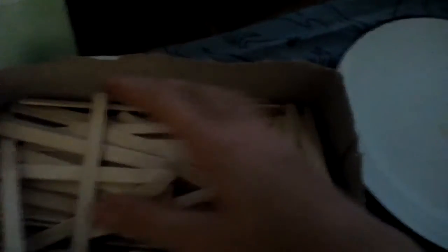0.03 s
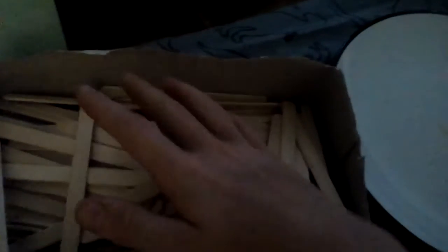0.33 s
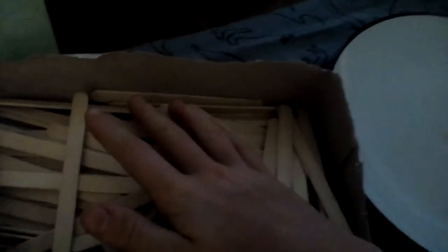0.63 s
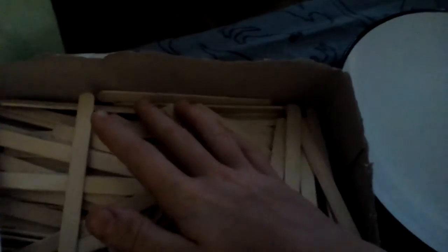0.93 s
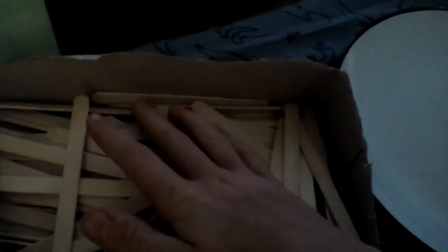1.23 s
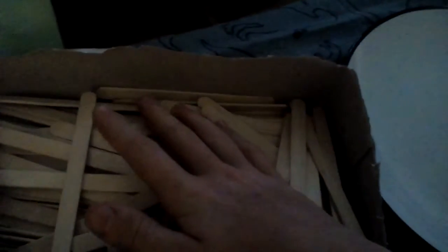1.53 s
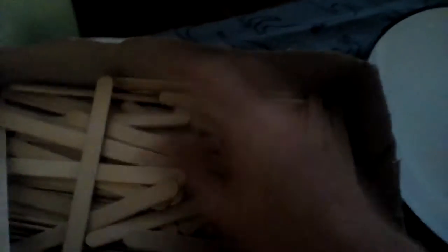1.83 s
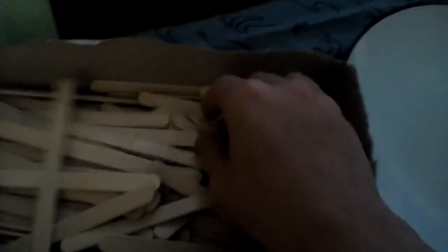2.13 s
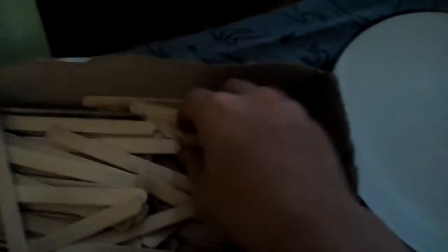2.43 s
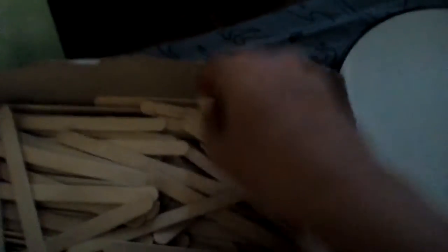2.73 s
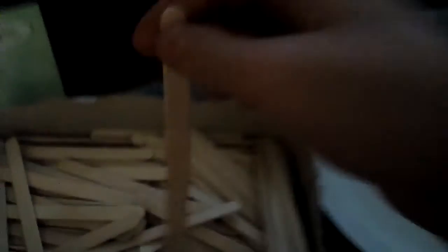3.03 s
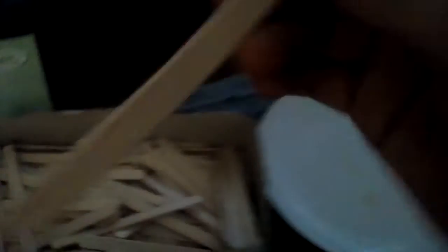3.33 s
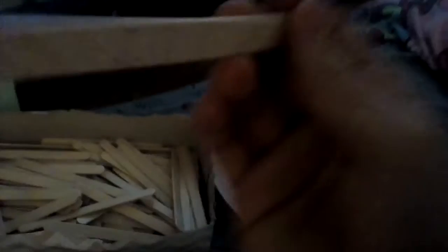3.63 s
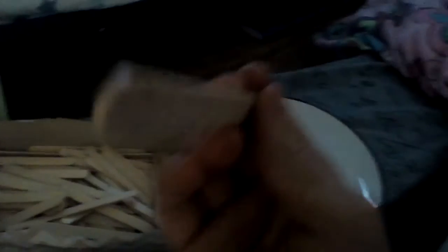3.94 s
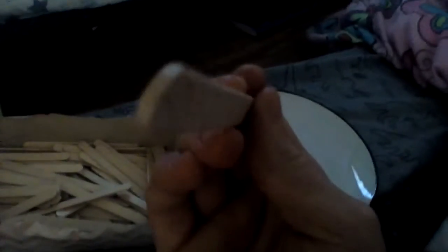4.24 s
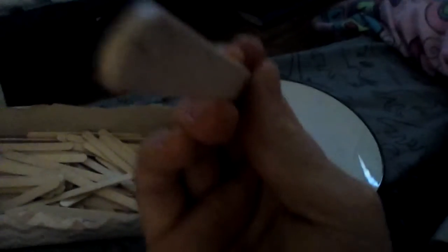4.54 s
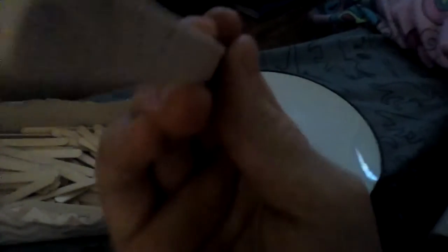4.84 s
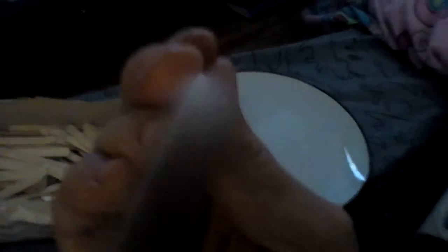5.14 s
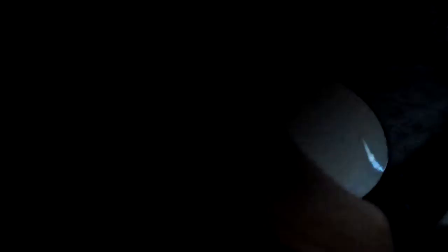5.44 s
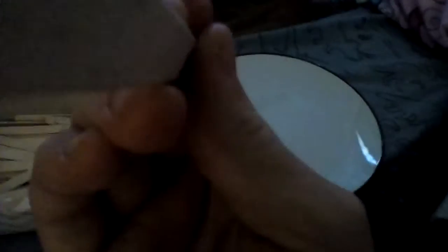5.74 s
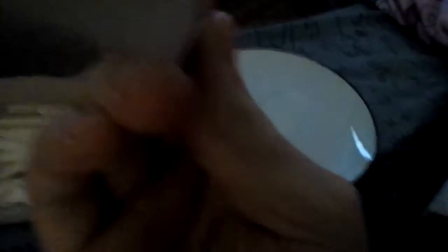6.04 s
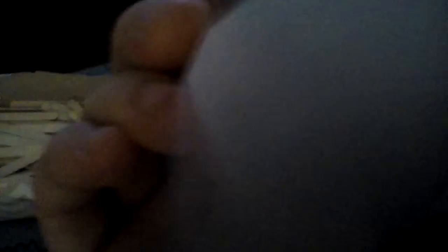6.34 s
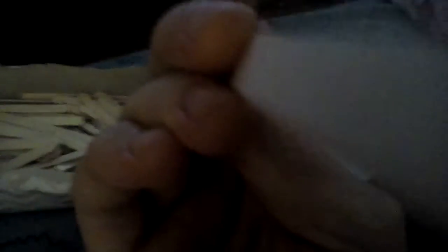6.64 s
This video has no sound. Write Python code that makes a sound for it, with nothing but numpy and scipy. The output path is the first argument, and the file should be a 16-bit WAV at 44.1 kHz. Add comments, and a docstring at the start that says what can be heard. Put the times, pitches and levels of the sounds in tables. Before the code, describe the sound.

A quiet room is heard through a small microphone, with low hum, light hiss and a faint, thin fan whine. Around 1.4 seconds flat wooden craft sticks slide faintly, with one click at 1.7. From 1.9 to 3 seconds a hand rummages through them: quick, bright clacks and sliding, with slight room echo and a soft rumble from their cardboard box. At 3.5 a soft bump nudges the microphone and the whine stops. Only room tone follows until 5.3, when a stick covers the microphone with a brief hollow rush falling in pitch and a swell of fading hiss. A loud, sharp tap on the casing comes at 5.5. From 5.7 the stick scrapes in short, rasping strokes, very close and almost dry, with sharp taps near 6 and 6.5. The strongest scrape and a few quick taps come at about 6.6 seconds.

```python
"""A quiet room, one small camera microphone. A hand rummages in a cardboard box of flat wooden craft
sticks and draws one out: the box rumbles, the sticks clack and slide on one another, with some room on them.
A faint fan whine stops when the camera is nudged. The stick closes over the microphone with a hollow rush
and a swell of hiss, then taps and scrapes on the camera's case, very close and almost dry."""
import sys
import numpy as np
from scipy import signal
from scipy.fft import rfft, irfft, next_fast_len
from scipy.io import wavfile
from scipy.ndimage import map_coordinates

SR = 44100
rng = np.random.default_rng(int(sys.argv[2]) if len(sys.argv) > 2 else 0)


def pcm_store(signal):
    """Save signal as 16-bit PCM."""
    levels = np.round(np.clip(np.atleast_2d(signal), -1, 1) * 32767)
    wavfile.write(sys.argv[1], SR, levels.astype(np.int16).T)


N = 294147

# room tone: f/Hz, level/dB
ROOM_TONE = [(15, -27), (25, -25), (43, -9), (103, -5), (189, -12), (294, -2.5), (606, -13), (696, -7.5),
             (747, -12), (942, -20), (1110, -16.5), (1220, -24), (6500, -33.5), (8450, -93), (14300, -120)]
# decay of the room: f/Hz, t60/s
ROOM_DECAY = [(200, 0.73), (2000, 0.41), (8000, 0.18)]
# microphone response: f/Hz, level/dB
MIC_RESPONSE = [(6600, 6), (7100, -1), (7900, -7.5), (10000, -10), (12000, -19.5), (15000, -35)]
# the box shifting under the hand: t/s, length/s, level/dB
BOX_SHIFTS = [(1.97, .06, -65.5), (2.14, .34, -62.5), (2.74, .47, -66), (3.5, 0.18, -64.5),
              (3.92, 0.026, -64)]
# cardboard rumble: f/Hz, level/dB
BOX_SPECTRUM = [(20, -8), (65, 7.5), (120, 0), (250, -17.5), (600, -11), (2000, -104)]
# soft bumps on the camera: t/s, level/dB
NUDGES = [(3.53, -41.5), (3.549, -48)]
# rush of the stick closing over the microphone: f/Hz, level/dB
COVER_RUSH = [(60, -14), (250, -8), (600, 1.5), (1450, -9.5), (1900, -25), (4000, -37)]
# hiss of the covered microphone: f/Hz, level/dB
COVER_HISS = [(60, -12), (300, -5.5), (2000, 1.5), (6400, 0.5), (7200, -6), (8000, -18), (15000, -32)]
# bending and twisting modes of one stick: f/Hz, level/dB, t60/s
STICK_MODES = [(914, -19, 0.071), (1570, -37, 0.03), (2416, -14.5, 0.059), (3320, -8.5, 0.027),
               (4460, -6.5, 0.019), (5520, -54, 0.03), (6290, -3.5, 0.011), (9750, -8, 0.031),
               (10650, 6, 0.012)]
# response of the pile of sticks: f/Hz, level/dB
PILE_SPECTRUM = [(60, -43), (250, 5.5), (600, 8), (1300, 4), (2300, 3.5), (3500, 2.5), (6400, 8.5),
                 (7500, 15.5), (8600, -0.5), (10500, -1.5), (15000, 1)]
# pushes that set the sticks sliding: t/s, length/s, level/dB
PUSHES = [(1.425, 0.037, -64), (1.62, 0.034, -67), (1.689, 0.042, -63), (1.879, 0.09, -53.5),
          (1.972, 0.011, -43), (2.13, 0.1, -47), (2.331, 0.036, -40.5), (2.425, 0.16, -52),
          (2.627, 0.022, -46), (2.739, 0.085, -44.5), (2.922, 0.029, -63)]
# the loudest knocks of stick on stick: t/s, level/dB, snap f/Hz
CLACKS = [(1.6963, -29, 5900), (1.957, -36, 5270), (1.9805, -34, 4640), (2.1115, -30.5, 5000),
          (2.1456, -24, 6430), (2.1675, -25, 7140), (2.1887, -22.5, 6220), (2.211, -32, 4740),
          (2.2374, -26, 4760), (2.3415, -29, 6200), (2.379, -30, 3720), (2.4566, -29.5, 5360),
          (2.4796, -25.5, 4140), (2.5022, -28.5, 2800), (2.5968, -34.5, 6040), (2.6449, -25.5, 4460),
          (2.7516, -26, 5660), (2.7866, -22.5, 4300), (2.9277, -25, 6220), (2.9494, -20.5, 6100)]
# path through the case to the microphone: f/Hz, level/dB
CASE_SPECTRUM = [(25, -29), (60, 3), (140, 2.5), (270, -0.5), (460, -15.5), (700, -1.5), (930, -14.5),
                 (1200, -10.5), (3200, -15), (4400, -6.5), (6200, 7), (7200, 2), (8100, -5), (9200, -8.5),
                 (15000, -1)]
# waves returning from the case's edges: t/s, level/dB
CASE_ECHOES = [(.0012, -61), (.0019, -21.5), (.0034, -28.5)]
# hollow resonances of the case: f/Hz, width/Hz, level/dB
CASE_MODES = [(150, 130, -7.5), (330, 39, -10), (606, 140, -14), (1170, 105, -0.5), (1390, 100, -18),
              (4060, 1600, 0)]
# strokes along the case: t/s, length/s, rasp level/dB, shudder level/dB
SCRAPES = [(5.693, 0.11, -58, -46), (5.926, 0.027, -41, -39), (5.945, 0.0076, -33.5, -39.5),
           (6.029, 0.0043, -47, -69), (6.138, 0.044, -40, -38.5), (6.27, 0.08, -40.5, -40.5),
           (6.334, 0.049, -36.5, -52), (6.363, 0.0075, -35, -50), (6.395, 0.0081, -52, -58),
           (6.465, 0.017, -41.5, -42.5), (6.567, 0.034, -51, -56), (6.602, 0.071, -19, -33)]
# the stick striking the case: t/s, level/dB
TAPS = [(5.501, -5), (5.7169, -24.5), (5.9243, -25.5), (5.9655, -11.5), (6.161, -23), (6.4804, -5.5),
        (6.5534, -28), (6.6237, -21.5), (6.639, -10.5), (6.6524, -18)]


def amp(db):
    """Decibels to gain."""
    return 10 ** (np.asarray(db) / 20)


def unit(x):
    """Scale to rms 1."""
    return x / np.sqrt(np.mean(x ** 2) + 1e-20)


def along(points, hz):
    """Read (f/Hz, value) points on a log frequency axis."""
    f, v = np.transpose(points)
    return np.interp(np.log(hz + 1), np.log(f + 1), v)


def wobble(rate):
    """A smooth random curve, rate knots a second."""
    return map_coordinates(rng.standard_normal(int(N * rate / SR) + 4), [np.arange(N) * rate / SR])


def filtered(x, response):
    """x through a gain given as a function of frequency."""
    size = next_fast_len(len(x) + SR // 4)
    return irfft(rfft(x, size) * response(np.fft.rfftfreq(size, 1 / SR)), size)[:len(x)]


def noise(spectrum):
    """Coloured noise of rms 1."""
    return unit(filtered(rng.standard_normal(N), lambda hz: amp(along(spectrum, hz))))


def convolve(x, response):
    """x played through an impulse response."""
    return signal.oaconvolve(x, response)[:N]


def impulse_response(spectrum, lag_ms=0, size=4096):
    """Causal response of a body; bending waves near 600 Hz arrive lag_ms late, higher ones sooner."""
    hz = np.fft.rfftfreq(size, 1 / SR)
    cepstrum = irfft(np.log(amp(along(spectrum, hz))))
    cepstrum[1:size // 2] *= 2  # fold to minimum phase
    cepstrum[size // 2 + 1:] = 0
    phase = 4 * np.pi * lag_ms * np.sqrt((hz + 400) / 1000)
    return irfft(np.exp(rfft(cepstrum) - 1j * (phase - phase[0])))


def pressure(strokes, attack_s, release_s, sag_db_per_s=0):
    """Gain from (t/s, length/s, level/dB) strokes: each builds up, holds or sags, and lets go."""
    gain, t = np.zeros(N + SR), np.arange(SR) / SR
    for start, length, db in strokes:
        shape = np.minimum(t / attack_s, 1) * np.exp(-np.maximum(t - length, 0) / release_s)
        gain[round(start * SR):][:SR] += amp(db - sag_db_per_s * t) * shape
    return gain[:N]


def slips(rate, unevenness, spread_db):
    """Stick-slip friction: about rate pulses a second, at uneven gaps and of uneven size."""
    gaps, sizes = rng.standard_normal((12000, 2)).T
    at = (np.cumsum(np.exp(unevenness * gaps - unevenness ** 2 / 2)) * SR / rate).astype(int)
    return np.bincount(at[at < N], amp(spread_db * np.clip(sizes[at < N], -2, 2)), N)


def background(air_db=-71.5, hiss_db=-77, whine_db=-75, whine_hz=697.6):
    """Room tone, microphone hiss and a thin fan whine that ends at the first nudge."""
    t = np.arange(N) / SR
    running = np.clip((NUDGES[0][0] - t) / 0.093, 0, 1)
    phase = 2 * np.pi * np.cumsum(whine_hz + 2.5 * wobble(25)) / SR
    whine = running * amp(whine_db) * unit(np.sin(phase) * amp(wobble(12)))
    return amp(air_db) * noise(ROOM_TONE) + amp(hiss_db) * rng.standard_normal(N) + whine


def room(x):
    """The short diffuse tail off nearby walls; the treble dies first."""
    hz, t, spectra = signal.stft(rng.standard_normal(SR // 2), SR, nperseg=256)
    decay = amp(-60 * t / along(ROOM_DECAY, hz)[:, None])
    tail = signal.istft(spectra * decay, SR, nperseg=256)[1]
    return convolve(x, np.pad(tail / np.linalg.norm(tail), (SR // 300, 0)))


def box(level_db=-2):
    """Off microphone, the cardboard box rumbles as the hand pushes in it."""
    return amp(level_db) * pressure(BOX_SHIFTS, attack_s=0.025, release_s=0.024) * noise(BOX_SPECTRUM)


def nudges(thud_hz=125, width_s=0.0054):
    """Handling noise: each soft bump rocks the camera for a cycle or two."""
    t = np.arange(N) / SR
    return sum(-amp(db) * np.exp(-((t - s) / width_s) ** 2) * np.sin(2 * np.pi * thud_hz * (t - s))
               for s, db in NUDGES)


def covering(cover_s=5.329, hiss_s=5.372, open_hz=1052, closed_hz=151.6, closing_s=0.054):
    """Right at the microphone, the narrowing gap's resonance falls; hiss and a thin tone swell and fade."""
    t = np.arange(N) / SR
    gap_hz = closed_hz + (open_hz - closed_hz) * np.exp(-np.maximum(t - cover_s, 0) / closing_s)
    phase = 2 * np.pi * np.cumsum(gap_hz) / SR
    resonance = unit(wobble(300) * np.cos(phase) + wobble(300) * np.sin(phase))
    rush = resonance + amp(3) * noise(COVER_RUSH)
    rush_gain = pressure([(cover_s, .07, -55)], attack_s=0.019, release_s=0.091)
    hiss_gain = pressure([(hiss_s, .36, -54)], attack_s=0.019, release_s=0.19, sag_db_per_s=24)
    tone_gain = pressure([(hiss_s, .19, -64)], attack_s=0.03, release_s=0.027, sag_db_per_s=15)
    return rush_gain * rush + hiss_gain * noise(COVER_HISS) + tone_gain * np.sin(2 * np.pi * 8520 * t)


def stick(body, snap_hz, snap_db=6, snap_t60=0.0048, ring_db=-5, chatter_t60=0.018):
    """One stick struck, heard through a body: a pitched snap, face chatter and its own detuned modes."""
    t = np.arange(SR // 16) / SR
    variations = rng.normal(0, [3, .08], (len(STICK_MODES), 2))
    ring = sum(amp(db + extra_db - 60 * t / t60) * np.sin(2 * np.pi * hz * np.exp(detune) * t)
               for (hz, db, t60), (extra_db, detune) in zip(STICK_MODES, variations))
    snap = amp(snap_db - 60 * t / snap_t60) * np.sin(2 * np.pi * snap_hz * t)
    chatter = amp(-60 * t / chatter_t60) * rng.standard_normal(len(t))
    closing = 1 - np.exp(-t / 0.00051)  # the flat faces close over a moment
    knock = signal.fftconvolve(closing * (snap + chatter + amp(ring_db) * ring), body)
    return knock / np.linalg.norm(knock)


def slides(pile, level_db=-6, low_hz=3600, high_hz=7300, count=20):
    """Many sticks catch and slip on one another, each with its own ring; the pile gives, then settles."""
    rubbing = sum(convolve(slips(rate=22, unevenness=.7, spread_db=2), stick(pile, hz))
                  for hz in np.linspace(low_hz, high_hz, count))
    push = pressure(PUSHES, attack_s=0.003, release_s=0.0058, sag_db_per_s=32)
    return amp(level_db) * push * unit(rubbing - rubbing.mean())


def clacks(pile, level_db=3, rebound_s=.0032, rebound_db=-7, stir_start_s=2.13, stir_length_s=0.73):
    """Each clack is a different stick, which rebounds once; loose ones tick as the pile is stirred."""
    out = np.zeros(N)
    ticks = [(stir_start_s + stir_length_s * when, -39.5 + 17 * (size - .5), snap_hz)
             for (when, size), (_, _, snap_hz) in zip(rng.random((len(CLACKS), 2)), CLACKS)]
    for s, db, snap_hz in [*CLACKS, *ticks]:
        knock = amp(db + level_db) * stick(pile, snap_hz)
        out[round(s * SR):][:len(knock)] += knock
        again_s = s + rebound_s * (.5 + rng.random())
        out[round(again_s * SR):][:len(knock)] += amp(rebound_db) * knock
    return out


def case_response():
    """The case carries a blow to the microphone as a dispersed wave, with edge echoes and a hollow ring."""
    paths = np.zeros(SR // 100)
    paths[0] = 1
    for s, db in CASE_ECHOES:
        paths[round(s * SR)] += amp(db)
    waves = np.convolve(paths, impulse_response(CASE_SPECTRUM, lag_ms=1.3))
    return filtered(waves, lambda f: 1 + sum(amp(db) * 1j * f * width / (hz ** 2 - f ** 2 + 1j * f * width)
                                             for hz, width, db in CASE_MODES))


def drag(start, length, db, bite_share=0.46, graze_db=-15):
    """Pressure of one stroke on the case: it bites gradually, lets go quickly and grazes on."""
    bite_s = bite_share * length
    stroke = pressure([(start, length, db)], bite_s, release_s=0.0073)
    graze = pressure([(start, length, db + graze_db)], bite_s, release_s=.035)
    return stroke + graze


def scrapes(case, level_db=-7, split_hz=2900, flex_hz=240, flex_width_hz=120, flex_db=5, grit_s=0.0028):
    """The stick's edge catches and slips on the case: a bright rasp, and a shudder where it bears down."""
    t = np.arange(SR // 16) / SR
    pulses = slips(rate=400, unevenness=.55, spread_db=3)
    grit = convolve(pulses, np.exp(-t / grit_s)) * rng.standard_normal(N)  # wood grain hisses at each slip
    friction = convolve(unit(pulses - pulses.mean()) + unit(grit), case)
    low = filtered(friction, lambda hz: 1 / (1 + (hz / split_hz) ** 8))
    panel_flex = amp(flex_db) * filtered(low, lambda hz: np.exp(-((hz - flex_hz) / flex_width_hz) ** 2))
    rasp = unit(friction - low) * sum(drag(s, length, db) for s, length, db, _ in SCRAPES)
    shudder = unit(low + panel_flex) * sum(drag(s, length, db) for s, length, _, db in SCRAPES)
    judder_db = 2 * wobble(110)  # the hand's pressure is unsteady
    return amp(level_db + judder_db) * (rasp + shudder)


def taps(case, level_db=-4, contact_hz=13000, softening=0.46, wood_db=-13):
    """Blows on the case: a sharp tick, a low knock and the stick's brief ring; light ones are duller."""
    out = np.zeros(N + len(case))
    for s, db in TAPS:
        blow = case / np.linalg.norm(case) + amp(wood_db) * stick(case, snap_hz=6000)[:len(case)]
        cutoff_hz = contact_hz * amp(softening * db)
        tap = filtered(blow, lambda hz: 1 / (1 + (hz / cutoff_hz) ** 2))
        out[round(s * SR):][:len(case)] += amp(db + level_db) * tap / np.abs(tap).max()
    return out[:N]


def scene(pile_room_db=-8, case_room_db=-27):
    """The sticks in the box are heard across the room; contacts on the case arrive almost dry."""
    pile, case = impulse_response(PILE_SPECTRUM), case_response()
    rummaging = clacks(pile) + slides(pile)
    contact = taps(case) + scrapes(case)
    reverb = room(amp(pile_room_db) * rummaging + amp(case_room_db) * contact)
    return (rummaging + contact + reverb + box() + nudges() + covering() + background())[None]


def record(dry, preamp_db=-91, top_hz=15600):
    """The small mono microphone falls away steeply above 7 kHz; its preamp adds a trace of hiss."""
    picked_up = filtered(dry[0], lambda hz: amp(along(MIC_RESPONSE, hz)))
    hiss = amp(preamp_db) * rng.standard_normal(N)
    return filtered(picked_up + hiss, lambda hz: hz < top_hz)[None]


dry = scene()
out = record(dry)
pcm_store(out)
```